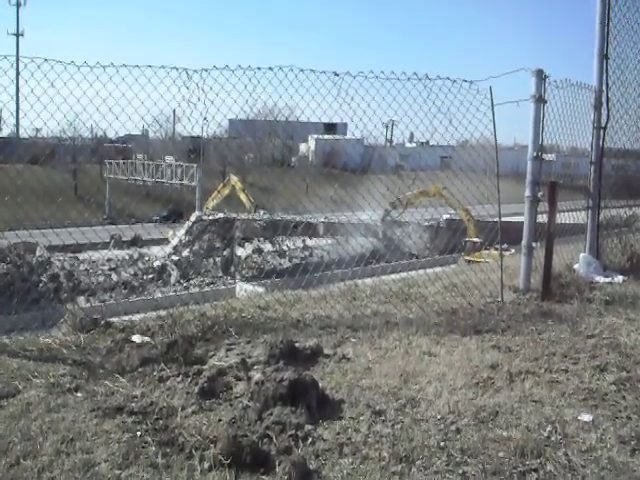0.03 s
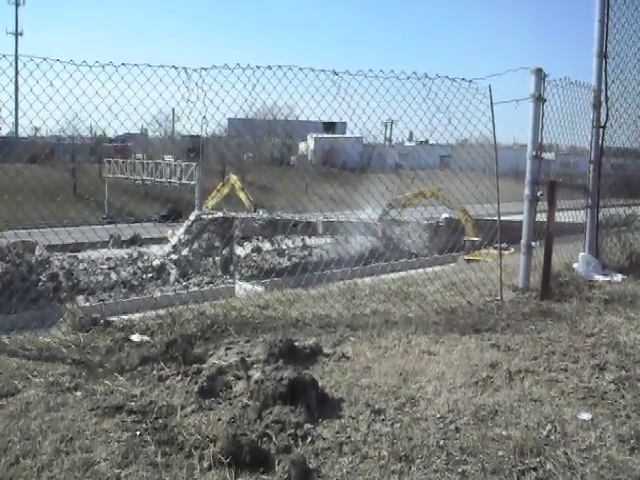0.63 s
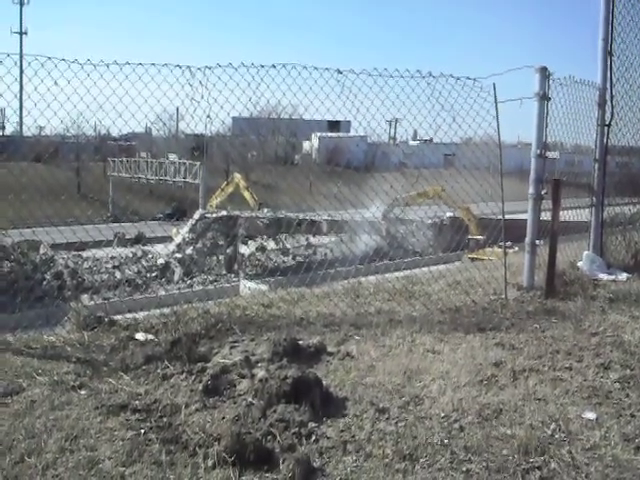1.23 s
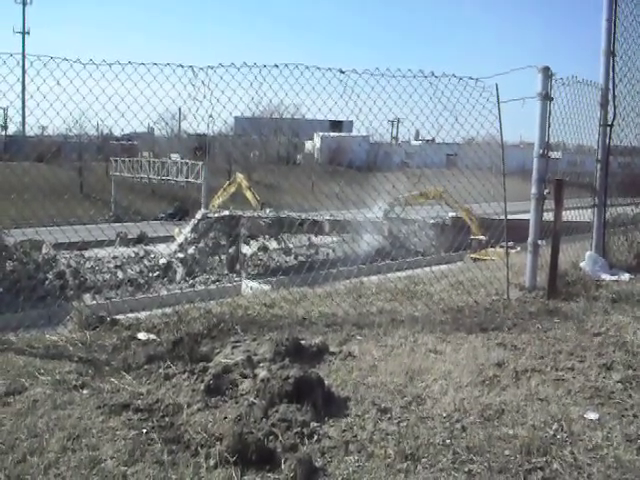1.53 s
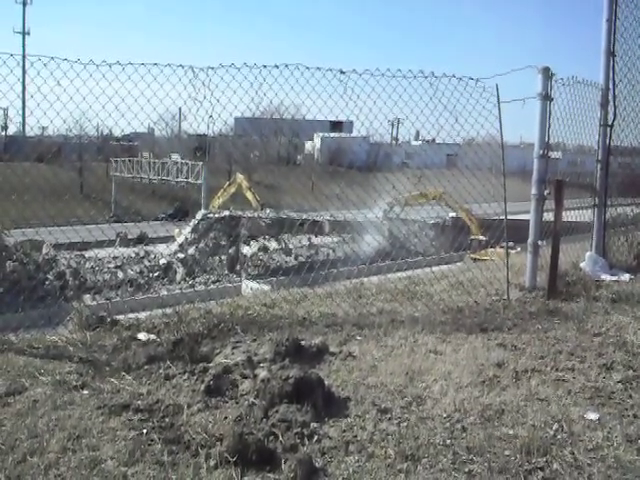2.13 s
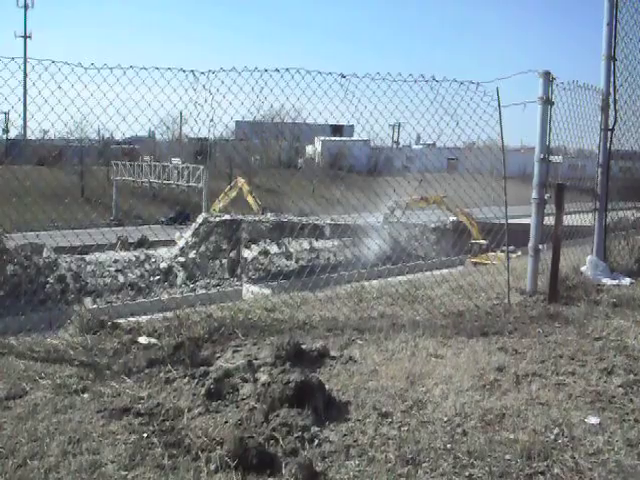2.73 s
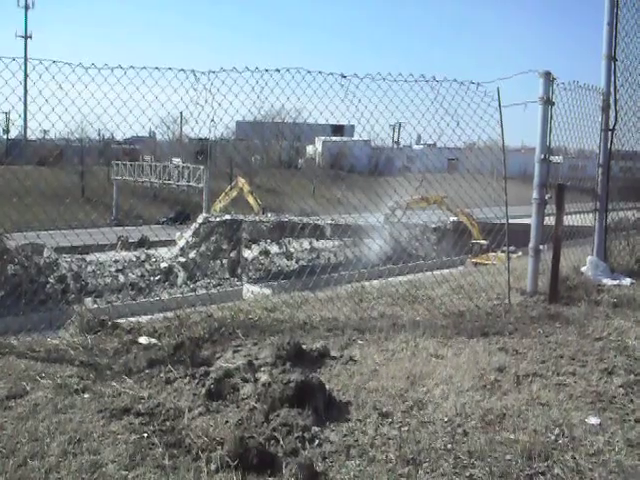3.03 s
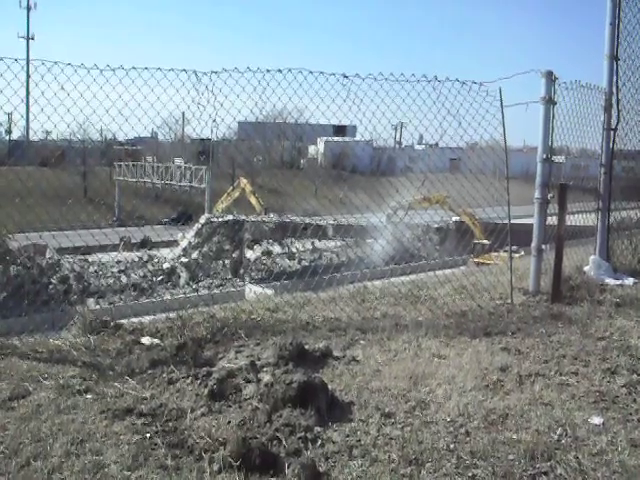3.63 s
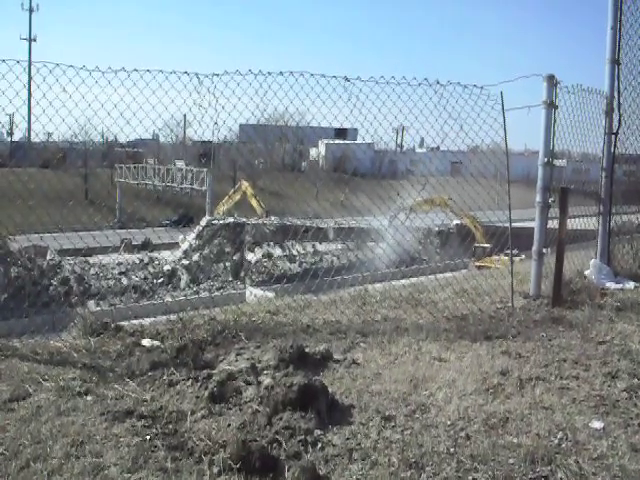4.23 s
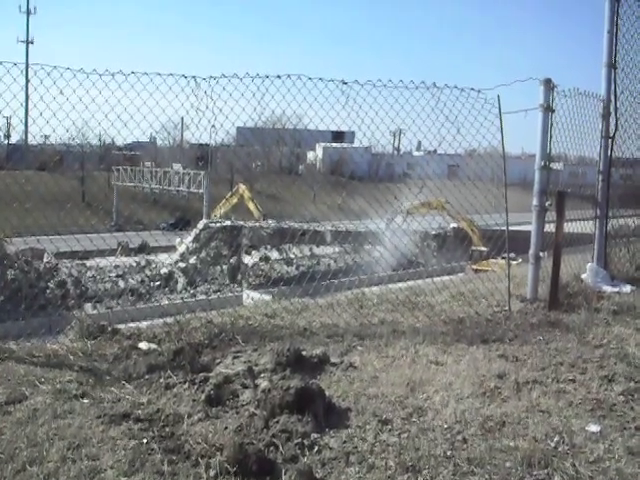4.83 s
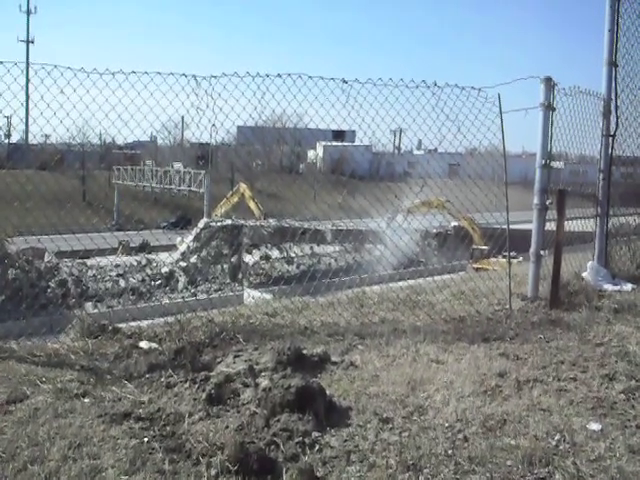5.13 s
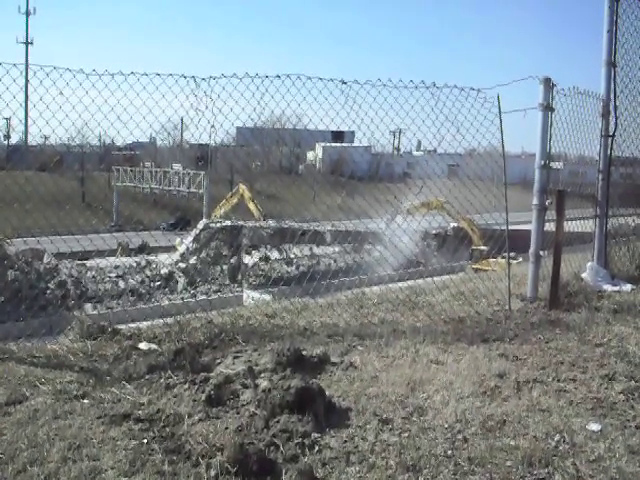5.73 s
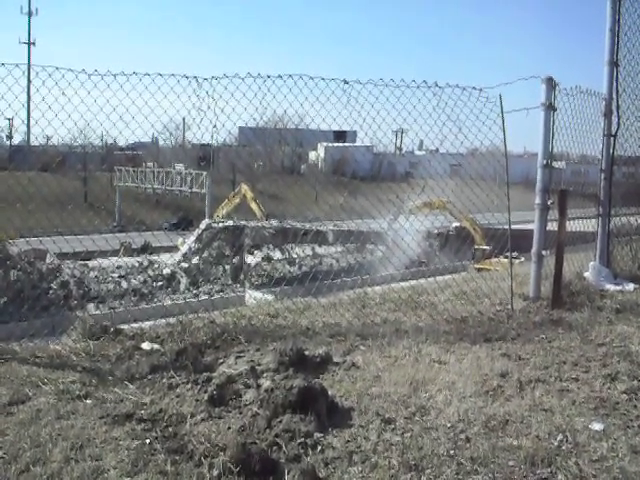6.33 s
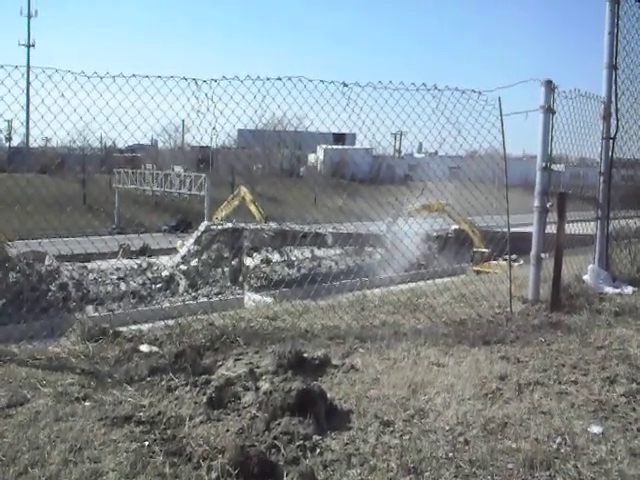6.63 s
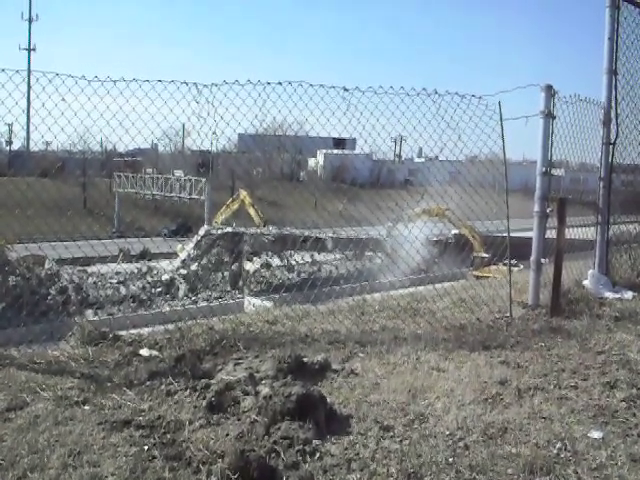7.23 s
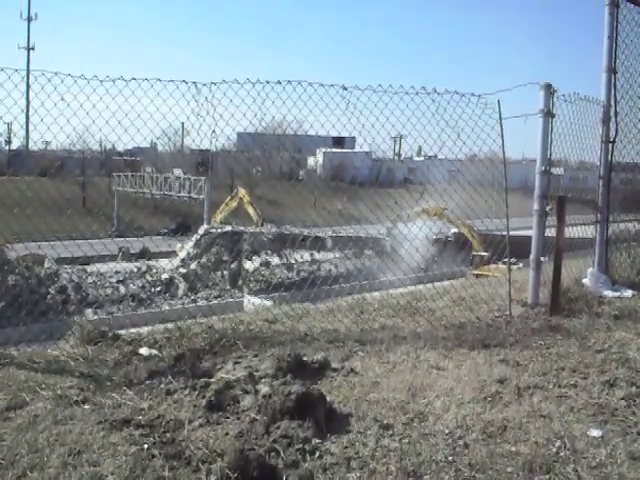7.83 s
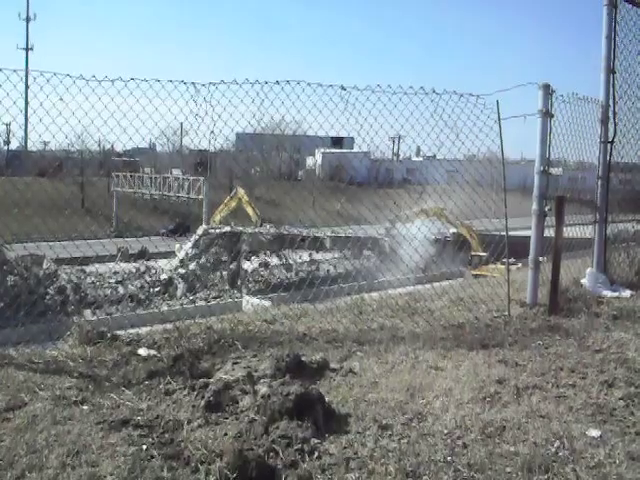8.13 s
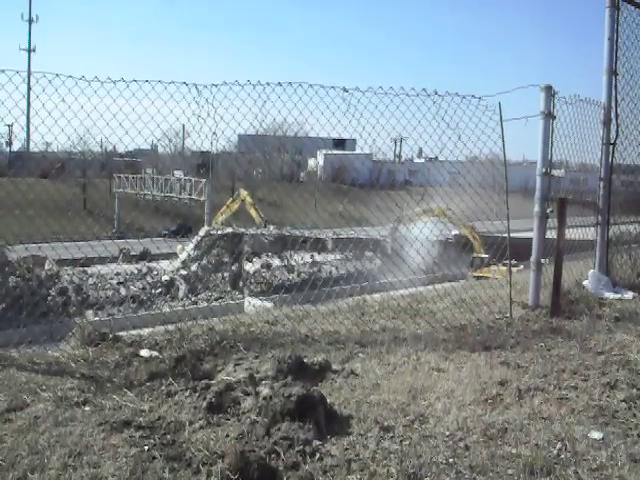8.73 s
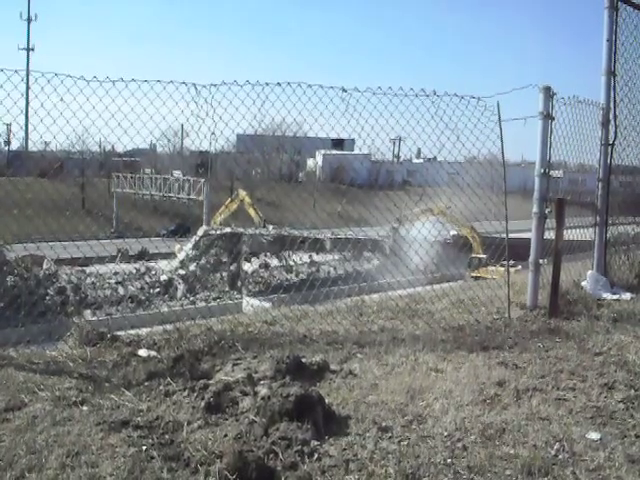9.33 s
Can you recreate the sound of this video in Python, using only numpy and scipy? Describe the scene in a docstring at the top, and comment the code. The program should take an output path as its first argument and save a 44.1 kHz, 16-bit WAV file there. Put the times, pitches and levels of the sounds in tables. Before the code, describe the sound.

At an outdoor demolition site, an excavator's hydraulic breaker pounds concrete with thumps, cracking stone and a ringing chisel, with two brief steel groans early on. A second breaker rattles briefly, then returns as the first speeds up and stops. It finishes by clanging on steel. Engines and traffic rumble throughout, all heard from a distance through a small, hissy microphone.

```python
"""Two excavators break concrete in a road cutting, heard from the bank above through a small camera.
Over a bed of engines, traffic and fluttering hiss, one hydraulic breaker pounds slowly: piston thump,
cracking stone and ringing chisel, scattered off rubble and walls, with two early groans of steel.
At 3 s a second breaker rattles for a second, and returns as the first speeds up and stops near 7 s.
The second ends up clanging on steel until 8.6 s; a faint rustle close by comes last."""
import sys
import numpy as np
from scipy import signal
from scipy.fft import rfft, irfft
from scipy.io import wavfile

SR = 44100
rng = np.random.default_rng(int(sys.argv[2]) if len(sys.argv) > 2 else 0)


def dump_mix(stems):
    """Bounce the given channels to the path in sys.argv[1] as a 16-bit WAV at rate SR."""
    frames = np.atleast_2d(stems).T  # one column per channel
    limited = np.clip(frames, -1, 1)  # hard clip at full scale
    pcm = np.round(limited * 32767).astype(np.int16)
    wavfile.write(sys.argv[1], SR, pcm)


N = 413658
TIME = np.arange(N) / SR

# colour of the camera's hiss: (frequency [Hz], relative level [dB])
HISS_COLOUR = [(500, -13), (2000, -5.5), (4500, 2.5), (6000, 2), (8200, 4), (10000, 1.5), (11000, -3.5)]
# the camera's electronic whines: (frequency [Hz], level [dB])
CAMERA_WHINES = [(7140, -82.5), (7852, -82.5)]
# low rumble of the site, swelling while the second breaker rattles, and tyre roar:
# (time [s], rumble level [dB], tyre level [dB])
BED_LEVELS = [(0.0, -39, -58), (2.6, -39, -57.5), (3.6, -30.5, -61), (4.5, -38.5, -57), (6.7, -33.5, -59),
              (8.0, -38.5, -56.5), (9.38, -44.5, -59.5)]
# colour of the site's low rumble: (frequency [Hz], relative level [dB])
RUMBLE_COLOUR = [(18, -6.5), (28, -7.5), (38, -5), (50, -10.5), (70, -6.5), (100, -18.5), (140, -17),
                 (200, -24), (320, -31), (600, -60.5)]
# colour of the tyre roar: (frequency [Hz], relative level [dB])
TYRE_COLOUR = [(100, -28), (250, -4), (450, 6.5), (700, 9.5), (1000, 4), (1400, -0.5), (2300, 0.5),
               (3500, -4.5), (6000, -10.5)]
# engine hum: (frequency [Hz], level [dB])
ENGINE_TONES = [(40.5, -44), (95, -55.5), (285, -62), (430, -73)]
# rustle close to the camera: (start [s], length [s], level [dB])
RUSTLES = [(9.19, .19, -64.5)]
# steel under load, one list for each groan: (time [s], pitch [Hz], level [dB])
GROANS = [
    [(.06, 359, -56), (.09, 364, -52), (.125, 394, -38.5), (.175, 379, -46), (.21, 385, -63)],
    [(.67, 579, -49), (.72, 521, -67), (.77, 449, -56), (.84, 409, -68), (.945, 437, -50), (.99, 452, -60)],
]
# the chisel scraping over concrete: (start [s], length [s], relative level [dB])
SCRAPES = [(2.94, .09, -62), (4.72, 0.41, -64)]
# resonances of the scrape: (frequency [Hz], width [Hz], relative level [dB])
SCRAPE_MODES = [(1650, 120, 15), (2080, 170, 1), (2620, 110, 8.5)]

# evenly paced bursts of the second breaker: (first stroke [s], last stroke [s])
RATTLE_BURSTS = [(2.974, 3.355), (3.42, 4), (5.653, 6.23), (6.292, 6.665), (6.728, 7.696), (7.735, 7.735),
                 (7.781, 8.578)]
# its strokes, on concrete first and steel at last, in relative levels:
# (time [s], recoil thud [dB], crack [dB], steel clang [dB])
RATTLE_LEVELS = [(3.0, -27, -55, -74), (4.0, -25.5, -55.5, -68), (5.65, -30.5, -67, -61),
                 (6.0, -27.5, -67, -64), (6.95, -28, -54, -67), (7.69, -37.5, -58.5, -67),
                 (7.76, -42, -53.5, -52.5), (8.1, -48, -53, -49.5), (8.45, -50, -61, -57),
                 (8.6, -47, -70, -59.5)]
# resonances of its housing: (frequency [Hz], width [Hz], relative level [dB])
SECOND_HOUSING_MODES = [(220, 48, 6), (439, 125, 6.5), (558, 217, 3), (676, 210, 5.5), (1031, 34, 2),
                        (1389, 27, -2), (1720, 143, -3.5), (1995, 230, -1.5), (2610, 245, -3),
                        (3420, 123, -5.5), (4830, 380, -14)]
# modes of the steel it strikes: (frequency [Hz], width [Hz], relative level [dB])
STEEL_MODES = [(186, 36, 8), (716, 22, 2), (1039, 24, 2), (2060, 130, -7), (2170, 70, 1), (2290, 110, -7),
               (4183, 70, -14), (4344, 90, -16)]

# single blows as the first breaker feels its way into the slab: (time [s], relative level [dB])
SINGLE_BLOWS = [(0.0, -21), (0.112, -15), (0.252, -17), (0.392, -19), (0.531, -21.5), (0.669, -23.5),
                (0.835, -21.5), (1.025, -21.5), (1.218, -19.5), (1.396, -16.5), (1.584, -17), (1.786, -19),
                (1.972, -18.5), (2.116, -19), (2.276, -18.5), (2.482, -18.5), (2.641, -17.5), (2.8, -16.5),
                (2.93, -16.5), (3.07, -15.5), (3.207, -14.5), (3.345, -15), (3.482, -16), (3.65, -17.5),
                (3.831, -16.5), (3.983, -17.5), (4.163, -18), (4.293, -17.5), (4.442, -17), (4.567, -17.5),
                (4.709, -18), (4.827, -19), (4.947, -18.5), (5.076, -17.5), (5.199, -17.5), (5.327, -17.5),
                (5.426, -18), (5.523, -16.5), (5.595, -18), (5.688, -18.5), (5.783, -20)]
# resonances of its housing and the slab: (frequency [Hz], width [Hz], relative level [dB])
FIRST_HOUSING_MODES = [(261, 122, 2), (425.6, 121, 2), (629.5, 87, 2), (789, 109, 0.5), (941, 62, -4),
                       (1395, 19, -9.5), (1609, 14, -8), (1805, 140, -13), (1980, 230, -23.5),
                       (2350, 366, -11.5), (2760, 122, -11.5), (3460, 230, -18.5), (5100, 330, -27)]
# its ringing side plates: (frequency [Hz], width [Hz], relative level [dB])
PLATE_MODES = [(679, 40, -5), (782, 11.4, 8), (924, 23, -4.5)]
# bending modes of its chisel, in the order low, high, middle: (frequency [Hz], swell time [s])
CHISEL_MODES = [(2318, .035), (4465, .024), (3480, .02)]
# how freely the chisel rings, in relative levels: (time [s], low ring [dB], high ping [dB])
CHISEL_LEVELS = [(0.05, -68.5, -70), (0.58, -52, -61.5), (0.87, -60.5, -67), (1.45, -71, -70),
                 (2.5, -69, -72), (2.87, -57.5, -59.5), (3.25, -63, -72), (4.0, -73, -78),
                 (5.1, -62.5, -76), (6.1, -80, -82)]
# low slapback from the walls of the cutting: (delay [s], level [dB])
WALL_ECHOES = [(0.0197, -10), (0.046, -17), (0.09, -19)]


def from_db(db):
    """Decibels to gain."""
    return 10 ** (np.asarray(db) / 20)


def rms_one(x):
    """Scale to unit rms."""
    return x / np.sqrt(np.mean(x ** 2) + 1e-20)


def drift(rate_hz):
    """Smooth random modulation with a spread of about 1."""
    step, run_in = 40, 2000
    pole = np.exp(-2 * np.pi * rate_hz * step / SR)
    white = rng.standard_normal(N // step + run_in + 2)
    slow = signal.lfilter([1], [1, -2 * pole, pole * pole], white)[run_in:]
    return np.interp(np.arange(N) / step, np.arange(len(slow)), rms_one(slow))


def noise(colour):
    """Steady noise of unit rms, rolling off below the colour's lowest point."""
    hz, db = np.transpose(colour)
    bin_hz = np.fft.rfftfreq(N, 1 / SR) + 1e-3
    gain = from_db(np.interp(np.log(bin_hz), np.log(hz), db)) * np.minimum(bin_hz / hz[0], 1) ** 2
    return rms_one(irfft(rfft(rng.standard_normal(N)) * gain, N))


def cut(x, hz, kind, order=2):
    """Butterworth low- or high-pass."""
    return signal.sosfilt(signal.butter(order, hz, kind, fs=SR, output="sos"), x + 1e-18)


def delayed(x, delay_s):
    """The same sound, later."""
    return np.interp(TIME - delay_s, TIME, x, left=0)


def at_times(rows, when):
    """Read each column of a curve at the given times."""
    times, *columns = np.transpose(rows)
    return [np.interp(when, times, column) for column in columns]


def paced(first_s, last_s, spacing_s):
    """Evenly spaced times, about spacing_s apart."""
    return np.linspace(first_s, last_s, round((last_s - first_s) / spacing_s) + 1)


def clicks(times, db):
    """One impulse for each blow."""
    out = np.zeros(N)
    np.add.at(out, np.clip(np.round(times * SR).astype(int), 0, N - 1), from_db(db))
    return out


def ring(x, hz, width_hz):
    """A unit click starts a damped sine of height 1."""
    r, w = np.exp(-np.pi * width_hz / SR), 2 * np.pi * hz / SR
    return signal.lfilter([0, np.sin(w)], [1, -2 * r * np.cos(w), r * r], x + 1e-18)


def body(x, modes):
    """Parallel resonances; white noise keeps its level through them."""
    t = TIME[:SR // 4]
    response = sum((-1) ** k * from_db(db) * width * np.exp(-np.pi * width * t)
                   * np.cos(2 * np.pi * hz * t) for k, (hz, width, db) in enumerate(modes))
    return signal.oaconvolve(x, response / np.linalg.norm(response))[:N]


def scatter(hits, t60_s, repeat, direct):
    """Dry hit plus a tail off the rubble: the share `repeat` is alike each time, air stirs the rest."""
    t = TIME[:SR // 2]
    tail = from_db(-60 * t / t60_s) * (1 - np.exp(-t / 0.00033))
    alike = signal.oaconvolve(hits, tail * rng.standard_normal(len(t)))[:N]
    stirred = np.sqrt(np.abs(signal.oaconvolve(hits ** 2, tail ** 2)[:N])) * rng.standard_normal(N)
    return direct * np.linalg.norm(tail) * hits + np.sqrt(repeat) * alike + np.sqrt(1 - repeat) * stirred


def rubs(rows, uneven_db, fade_s):
    """Envelope of rubbing: each rub fades in, holds unevenly and fades out."""
    gain = sum(from_db(db) * np.clip(np.minimum(TIME - start, start + length - TIME) / fade_s, 0, 1)
               for start, length, db in rows)
    return gain * from_db(uneven_db * drift(13))


def camera_noise(hiss_db=-65, flutter_db=4.0, frame_hz=30):
    """Electronic hiss that steps up during part of every frame, and two faint whines."""
    phase = TIME * frame_hz % 1
    raised = (phase > .255) & (phase < .68)
    whine = sum(from_db(db) * np.sqrt(2) * np.sin(2 * np.pi * hz * TIME) for hz, db in CAMERA_WHINES)
    return from_db(hiss_db + flutter_db * raised) * noise(HISS_COLOUR) + whine


def site_bed():
    """Low rumble that swells while the second breaker rattles, tyre roar and wavering engine tones."""
    rumble_db, tyre_db = at_times(BED_LEVELS, TIME)
    bed = from_db(rumble_db) * noise(RUMBLE_COLOUR) + from_db(tyre_db) * noise(TYRE_COLOUR)
    for hz, db in ENGINE_TONES:
        gain = from_db(db + 2 * drift(4.0)) * np.sqrt(2)
        cycles = hz * np.cumsum(1 + 0.00801 * drift(3.19)) / SR
        bed += gain * np.sin(2 * np.pi * cycles)
    return bed


def rustle():
    """A faint, bright brush of noise close by."""
    envelope = rubs(RUSTLES, uneven_db=3, fade_s=0.021)
    return envelope * noise([(1500, 0), (3000, 0), (10000, -3), (11500, -20)])


def steel_groans(rough_db=2):
    """Steel under load groans in rough, gliding tones."""
    groans = np.zeros(N)
    for rows in GROANS:
        times, hz, db = np.transpose(rows)
        cycles = np.cumsum(np.interp(TIME, times, hz) * (1 + 0.014 * drift(33))) / SR
        level_db = np.interp(TIME, times, db, left=-200, right=-200) + rough_db * drift(25)
        groans += from_db(level_db) * np.sin(2 * np.pi * cycles)
    return groans


def chisel_scrape(trim_db=3, slips_per_s=900):
    """The chisel's point drags over concrete in dense little slips."""
    slips = rms_one((rng.random(N) < slips_per_s / SR) * rng.standard_normal(N))
    return from_db(trim_db) * rubs(SCRAPES, uneven_db=4, fade_s=.05) * body(slips, SCRAPE_MODES)


def second_breaker(spacing_s=.0645, return_s=0.0354, push_db=-5, spread_db=1):
    """A fast rattle: each crack pushes on the boom, then the piston is driven back up with a thud."""
    times = np.concatenate([paced(first, last, spacing_s) for first, last in RATTLE_BURSTS])
    variation_db = spread_db * rng.standard_normal((len(times), 3)).T
    thud_db, crack_db, clang_db = at_times(RATTLE_LEVELS, times) + variation_db
    recoil = clicks(times, thud_db + push_db) + clicks(times + return_s, thud_db)
    thuds = cut(cut(ring(recoil, hz=72, width_hz=30), 45, "high"), 125, "low")
    cracks = scatter(clicks(times, crack_db), t60_s=0.21, repeat=0.35, direct=0.42)
    clangs = scatter(clicks(times, clang_db), t60_s=0.43, repeat=0.18, direct=0.33)
    return (from_db(8) * thuds + from_db(5) * body(cracks, SECOND_HOUSING_MODES)
            + from_db(4) * body(clangs, STEEL_MODES))


def pounding(sag_db_per_s=1, spread_db=0.5, crack_follows=0.45, crumble_db_per_s=6):
    """Times, thump and crack levels of the first breaker: single blows, then a run at full speed."""
    single_s, single_db = np.transpose(SINGLE_BLOWS)
    run_s = paced(first_s=5.847, last_s=6.842, spacing_s=.071)
    run_db = -22 - sag_db_per_s * (run_s - run_s[0])  # short strokes hit less hard
    run_db += spread_db * rng.standard_normal(len(run_s))
    times, thump_db = np.r_[single_s, run_s], np.r_[single_db, run_db]
    crack_db = -45 + crack_follows * (thump_db - single_db.mean())
    crack_db -= crumble_db_per_s * np.maximum(times - run_s[0], 0)  # at full speed the stone crumbles
    return times, thump_db, crack_db


def chime(hits, hz, swell_s, waver_db=3):
    """A clean steel tone that swells as its echoes gather, then dies; the air makes it waver."""
    t = TIME[:SR // 3]
    tone = t / swell_s * np.exp(1 - t / swell_s) * np.sin(2 * np.pi * hz * t)
    steady = signal.oaconvolve(hits, tone)[:N]
    wander_s = drift(21) / (2 * np.pi * hz)  # the path length wanders by about a radian
    return delayed(steady, wander_s) * from_db(waver_db * drift(25))


def chisel_ring(times, crack_db, echo_s=.025, onset_s=.004):
    """The chisel rings in three bending modes; the lowest arrives late, by way of the walls."""
    low_db, ping_db = at_times(CHISEL_LEVELS, times)
    low = chime(clicks(times + echo_s, low_db), *CHISEL_MODES[0])
    ping = chime(clicks(times + onset_s, ping_db), *CHISEL_MODES[1])
    middle = chime(clicks(times + onset_s, crack_db - 27), *CHISEL_MODES[2])
    return from_db(4) * (low + ping) + middle


def stone_cracks(hits):
    """Stone breaks with a tight snap and a long spray, coloured by housing and slab."""
    snap = scatter(hits, t60_s=.045, repeat=.7, direct=.6)
    spray = scatter(hits, t60_s=0.42, repeat=0.32, direct=0)
    return cut(body(from_db(1) * snap + from_db(2) * spray, FIRST_HOUSING_MODES), 4100, "low")


def side_plates(hits, echo_s=0.024):
    """The housing's side plates ring; the sound comes back off the walls."""
    return body(scatter(delayed(hits, echo_s), t60_s=0.24, repeat=0.091, direct=0.42), PLATE_MODES)


def thumps(blows, slam_s=.0085):
    """The piston knocks on the chisel and shoves the slab; the housing slams back with a deep thump."""
    slams = delayed(blows, slam_s)
    shove = from_db(-3) * ring(blows, hz=122, width_hz=70)
    rebound = ring(slams, hz=183, width_hz=60)
    weight = cut(cut(shove + rebound, 95, "high"), 600, "low")
    knock = ring(.6 * delayed(blows, .002) + slams, hz=360, width_hz=130)
    direct = weight + from_db(-12) * cut(knock, 250, "high")
    echoes = sum(from_db(db) * delayed(direct, delay) for delay, db in WALL_ECHOES)
    tail = scatter(blows, t60_s=0.34, repeat=0.45, direct=0)
    boom = body(tail, [(158.0, 48, -4.5), (251, 210, -12.5)])
    return direct + echoes + from_db(-19) * cut(boom, 261, "low", order=4)


def first_breaker(crack_lag_s=.003):
    """The lead: every blow layers cracking stone, ringing steel and a thump."""
    times, thump_db, crack_db = pounding()
    hits = clicks(times + crack_lag_s, crack_db)
    return (stone_cracks(hits) + from_db(-6) * side_plates(hits)
            + chisel_ring(times, crack_db) + thumps(clicks(times, thump_db)))


def scene():
    """Both breakers over the bed, dulled by distance; only the close rustle stays bright."""
    site = first_breaker() + second_breaker() + steel_groans() + chisel_scrape() + site_bed()
    distant = cut(site, 5600, "low", order=4)
    return (distant + rustle())[None]


def record(dry):
    """The camera adds its own noise and cuts the top end steeply."""
    high_cut = signal.cheby2(12, 60, 11940, fs=SR, output="sos")
    return signal.sosfilt(high_cut, dry + camera_noise())


dry = scene()
out = record(dry)
dump_mix(out)
```